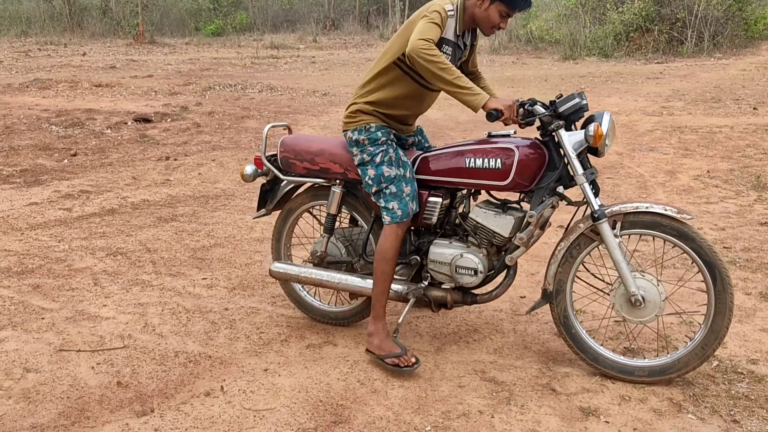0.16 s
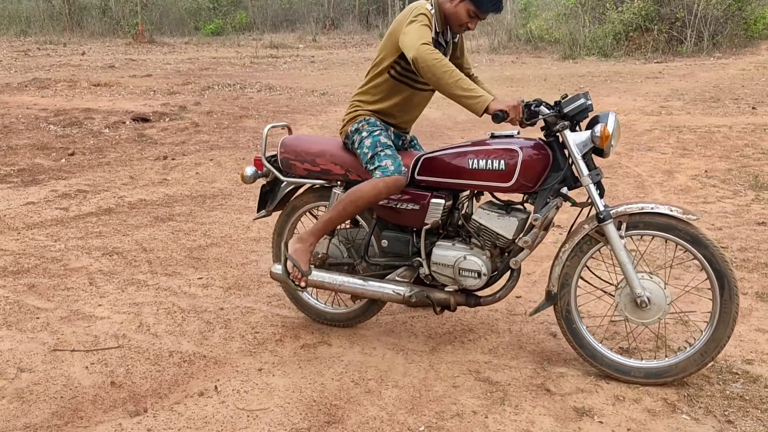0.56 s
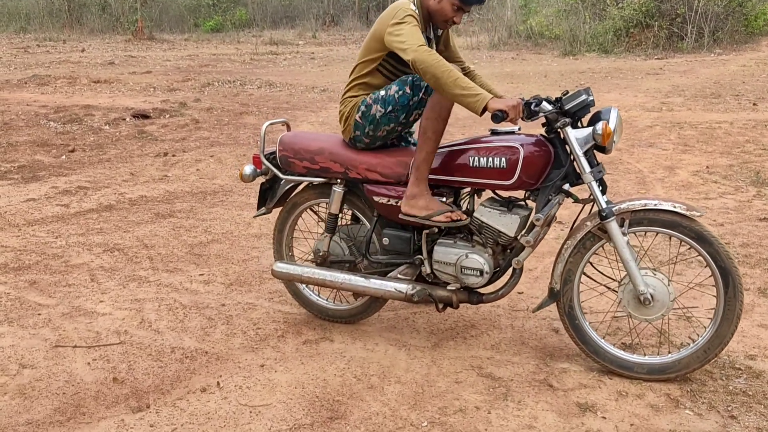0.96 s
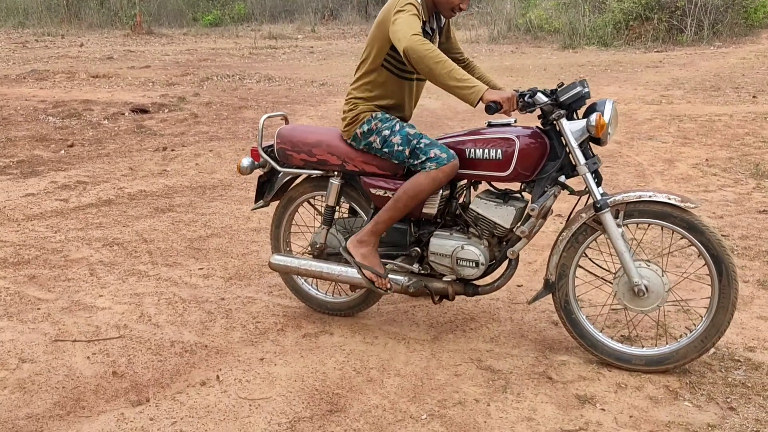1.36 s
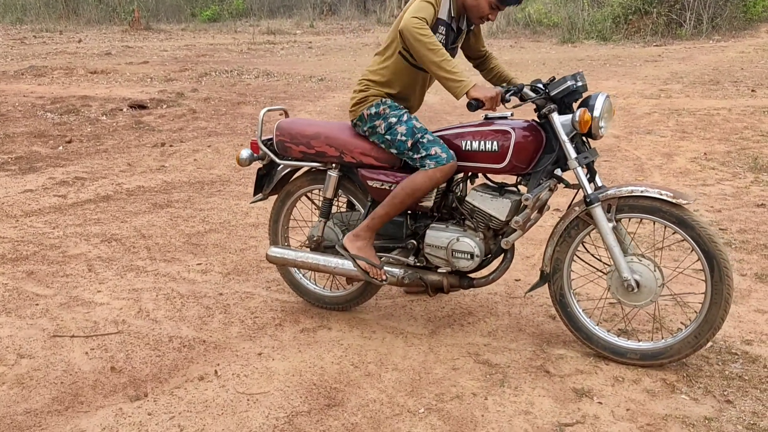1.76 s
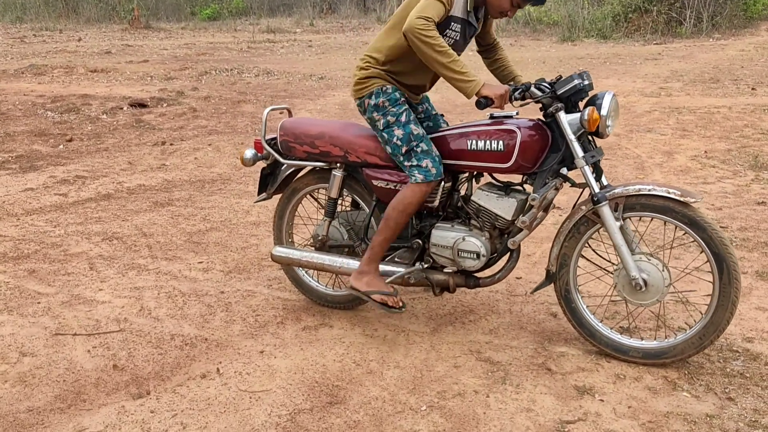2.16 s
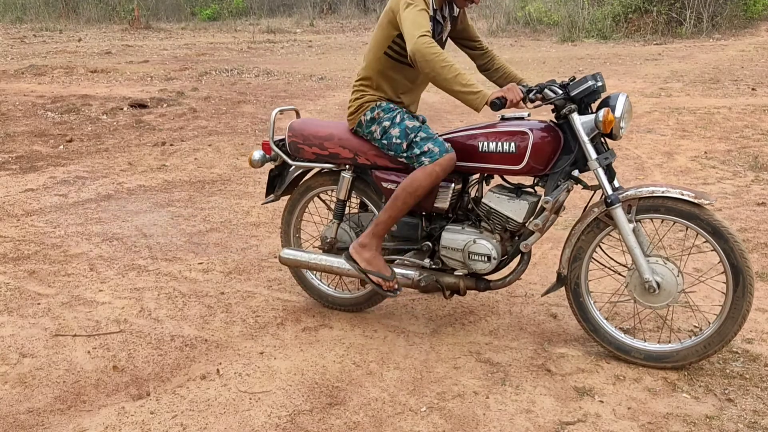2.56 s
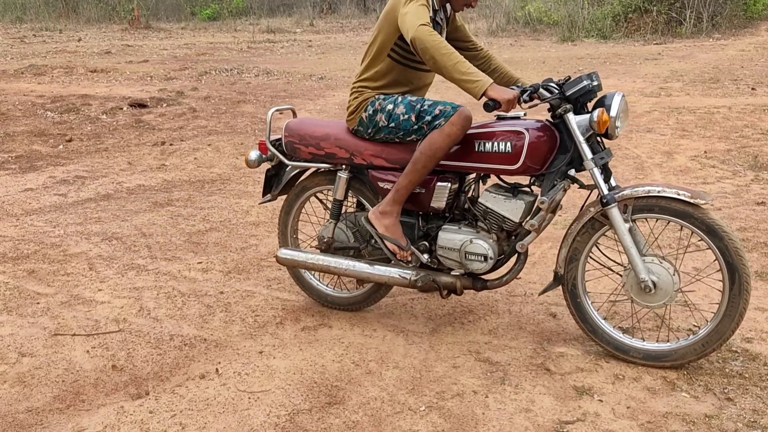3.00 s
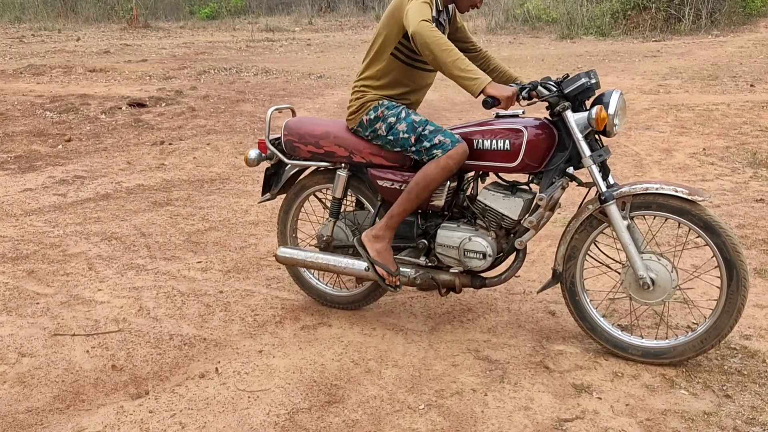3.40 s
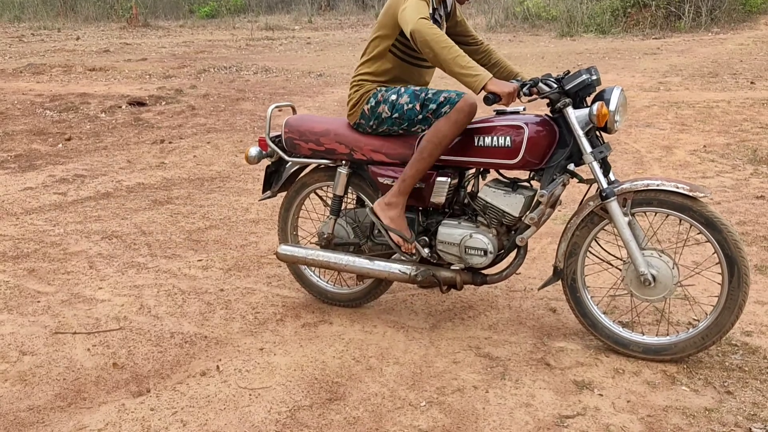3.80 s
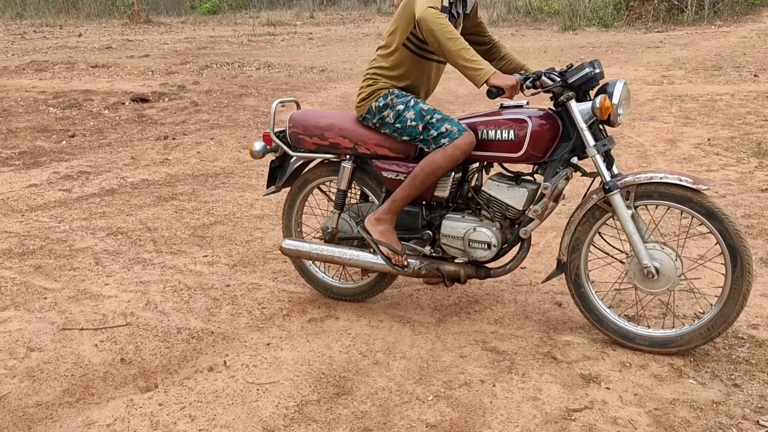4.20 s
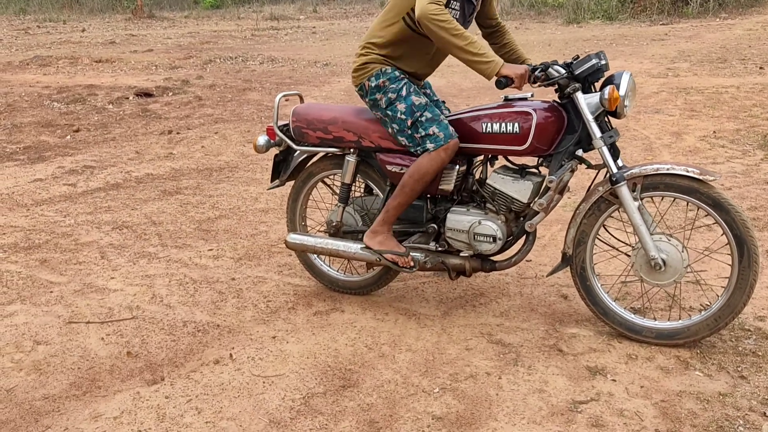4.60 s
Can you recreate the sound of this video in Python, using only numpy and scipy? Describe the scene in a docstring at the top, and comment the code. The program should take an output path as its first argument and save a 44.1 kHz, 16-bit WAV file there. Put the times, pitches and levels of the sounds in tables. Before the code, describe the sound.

Close stereo sound on open dirt: a small motorcycle's kick lever is stamped down, giving a quick run of low falling exhaust puffs, gear whirr and loud steel clatter. Quiet clunks and sandal scuffs follow. A second kick brings a sharp clack, more puffs and a bright ringing lever slam. Then only light ratchet clicks and gritty rustles remain, with a faint bird chirping over low rumble.

```python
"""Open dirt ground: a small two-stroke motorcycle is kicked over twice and does not fire.
Puffs are falling tones with ragged noise; the silencer hums after them. Steel contacts are enveloped
noise bands, the slamming lever adds ringing modes. Gears whirr and grit rustles as uneven noise.
Between kicks the rider feels for compression and the ratchet clunks.
A far bird chirps in falling sines over filtered-noise rumble, drone and hiss."""
import sys
import numpy as np
from scipy import signal
from scipy.fft import rfft, irfft
from scipy.io import wavfile

SR = 44100
rng = np.random.default_rng(int(sys.argv[2]) if len(sys.argv) > 2 else 0)


def put_to_file(sound):
    """Save the sound as 16-bit audio at rate SR, in the file named by the first command-line argument."""
    columns = np.atleast_2d(sound).T  # one column per channel
    safe = np.clip(columns, -1, 1)
    whole_steps = np.round(safe * 32767)
    wavfile.write(sys.argv[1], SR, whole_steps.astype(np.int16))


N = 209430
TIME = np.arange(N) / SR
BINS_HZ = np.maximum(np.arange(N // 2 + 1) * SR / N, 1)

# exhaust puffs, one per turn of the crank: start_s, level_db
PUFFS = [(.241, -22.5), (0.338, -26), (0.451, -29), (0.593, -31), (0.674, -43), (0.751, -39.5),
         (1.503, -50), (2.312, -21.5), (2.410, -22.5), (2.504, -28), (2.634, -28), (2.789, -36)]


def from_db(db):
    """Decibels to gain."""
    return 10 ** (np.asarray(db) / 20)


def rms_one(x):
    """Scale to unit rms."""
    return x / np.sqrt(np.mean(x ** 2) + 1e-20)


def over_hz(points):
    """Table interpolated over log frequency at every bin."""
    hz, value = np.transpose(points)
    return np.interp(np.log(BINS_HZ), np.log(hz), value)


def band(low_hz, high_hz, order=4):
    """Gain of a band with smooth skirts."""
    below = (low_hz / BINS_HZ) ** (2 * order)
    above = (BINS_HZ / high_hz) ** (2 * order)
    return 1 / np.sqrt((1 + below) * (1 + above))


def colour(points):
    """Gain of a tabled spectrum that falls away beyond its ends."""
    return from_db(over_hz(points)) * band(points[0][0], points[-1][0])


def resonances(modes):
    """Gain of a body with broad modes (centre Hz, width Hz, dB), summed in power."""
    powers = [from_db(db) ** 2 / (1 + (2 * (BINS_HZ - hz) / width_hz) ** 2)
              for hz, width_hz, db in modes]
    return np.sqrt(sum(powers))


def noise(gain):
    """Stereo noise of a given colour, more alike in the bass; rms 1."""
    # left-right likeness: freq_hz, correlation (0-1)
    likeness = [(25, .95), (80, .99), (300, .98), (1000, .94), (2700, .86), (5000, .65), (9000, .5)]
    mid, side = rfft(rng.standard_normal((2, N))) * gain
    alike = np.clip(over_hz(likeness), 0, 1)
    common = np.sqrt(1 + alike) * mid
    opposed = np.sqrt(1 - alike) * side * [[1], [-1]]
    return rms_one(irfft(common + opposed, N))


def grain(rate_hz, depth_db):
    """Uneven gain of many tiny contacts: band-limited random level; rms 1."""
    spectrum = rfft(rng.standard_normal(N)) * band(rate_hz / 10, rate_hz, order=2)
    wander = rms_one(irfft(spectrum, N))
    return rms_one(from_db(depth_db * np.clip(wander, -2, 2)))


def ring(force, hz, t60_s):
    """Damped mode: a unit click sets a sine of initial height 1 ringing."""
    radius = from_db(-60 / (t60_s * SR))
    angle = 2 * np.pi * hz / SR
    feedback = [1, -2 * radius * np.cos(angle), radius * radius]
    return signal.lfilter([0, np.sin(angle)], feedback, force + 1e-18)


def add(track, start_s, sound):
    """Mix a sound into a track at a time."""
    start = max(round(start_s * SR), 0)
    track[start:start + len(sound)] += sound[:max(N - start, 0)]


def blows(times_s, levels_db, hold_s, rise_s, decay_s, tail_db, tail_decay_s):
    """Envelope of knocks: each rises, holds briefly, dies fast and leaves a faint tail."""
    power, t = np.zeros(N), TIME[:SR // 3]
    dying = np.exp(-np.maximum(t - hold_s, 0) / decay_s) + from_db(tail_db) * np.exp(-t / tail_decay_s)
    shape = np.minimum(t / rise_s, 1) * dying
    for start_s, db in zip(times_s, levels_db):
        add(power, start_s, (from_db(db) * shape) ** 2)
    return np.sqrt(power)


def envelope(start_s, attack_s, hold_s, release_s):
    """Gain that rises linearly, holds and dies away exponentially."""
    t = TIME - start_s
    return np.clip(t / attack_s, 0, 1) * np.exp(-np.maximum(t - attack_s - hold_s, 0) / release_s)


def outdoors(rumble_db=-56, air_db=-75, drone_start_db=-66.5, drone_db_per_s=3, drone_hz=(140, 195)):
    """Low rumble and a wavering, slowly growing far drone under a faint steady hiss."""
    # low outdoor rumble: freq_hz, density_db (per Hz)
    rumble_spectrum = [(18, 2), (35, 2.5), (55, 4), (90, 0), (130, -14), (250, -11.5), (450, -19.5),
                       (800, -29.5)]
    rumble = from_db(rumble_db) * noise(colour(rumble_spectrum))
    drone_gain = from_db(drone_start_db + drone_db_per_s * TIME)
    drone = drone_gain * noise(band(*drone_hz)) * grain(31, 2.9)
    air = from_db(air_db) * noise(band(290, 7300) / np.sqrt(BINS_HZ))
    return rumble + drone + air


def bird(start_hz=5500, end_hz=2740, fall_s=.0108, swoop_s=.034, held_db=-17, length_s=.075,
         scatter_db=-2):
    """A thin, wavering whistle swoops down and lingers on its last note, blurred by scrub scattering."""
    # bird chirps: start_s, level_db
    chirps = [(1.150, -68), (1.552, -63), (1.955, -62), (2.964, -61.5), (3.317, -60), (3.624, -55),
              (4.007, -58), (4.289, -62.5), (4.588, -57)]
    whistle, t = np.zeros(N), TIME[:int(length_s * SR)]
    hz = end_hz + (start_hz - end_hz) * np.exp(-t / fall_s)
    swoop = np.sin(np.pi * np.minimum(t / swoop_s, 1))
    effort = swoop + from_db(held_db) * np.sin(np.pi * t / length_s)
    chirp = effort * np.sin(2 * np.pi * np.cumsum(hz) / SR)
    for start_s, db in chirps:
        add(whistle, start_s, from_db(db) * chirp)
    whistle = whistle * grain(450, 5)
    scrub = rng.standard_normal((2, SR // 4)) * np.exp(-TIME[:SR // 4] / 0.034)
    scrub /= np.linalg.norm(scrub, axis=1, keepdims=True)
    scattered = signal.fftconvolve(whistle[None], scrub, axes=1)[:, :N]
    return whistle + from_db(scatter_db) * scattered


def gear_speed(spin_up_db_per_s=112, resting_db=-78):
    """Whirr gain: strokes spin the gears up, friction runs them down; never quite still under the rider."""
    # lever strokes, two full kicks and gentle pushes: top_speed_s, whirr_db, run_down_db_per_s
    strokes = [(0.368, -43, 48), (1.33, -61, 28), (1.84, -60.5, 82), (2.381, -43.5, 46.5),
               (3.559, -60.5, 103.5), (3.93, -63, 35.5), (4.3, -68.5, 32.5), (4.72, -62.5, 31)]
    power = from_db(resting_db) ** 2
    for peak_s, db, run_down_db_per_s in strokes:
        drop_db = np.maximum(spin_up_db_per_s * (peak_s - TIME), run_down_db_per_s * (TIME - peak_s))
        power = power + from_db(db - drop_db) ** 2
    return np.sqrt(power)


def grit_motion(tyre_db=-5.5, resting_db=-74.5):
    """Grit gain: tyres rock with every stroke (dB against the whirr), sandals scuff dirt and footrest."""
    # sandal scuffs: middle_s, half_length_s, level_db
    scuffs = [(0.145, 0.028, -61), (0.247, 0.028, -51), (0.377, 0.027, -39), (0.95, 0.025, -65.5),
              (1.538, 0.032, -58.5), (1.82, 0.086, -53.5), (2.222, 0.017, -56.5), (2.705, 0.098, -54.5),
              (4.22, 0.067, -64), (4.685, 0.038, -59.5)]
    tyres = from_db(tyre_db) * gear_speed()
    power = tyres ** 2 + from_db(resting_db) ** 2
    for middle_s, half_s, db in scuffs:
        power = power + (from_db(db) / np.cosh((TIME - middle_s) / half_s)) ** 2
    return np.sqrt(power)


def crackle(per_s=130, size_db=4, crackle_db=-6, decay_s=0.0012):
    """Single grains crack: a few loud ones underfoot, many small ones while the grit shifts."""
    # dry grit ticks: start_s, level_db
    ticks = [(0.166, -43.5), (.176, -46), (1.752, -48.5), (1.914, -43.5), (3.041, -43), (4.155, -54),
             (4.338, -49.5), (4.411, -53.5), (4.546, -50)]
    # tick colour: freq_hz, density_db (per Hz)
    tick_spectrum = [(1200, 1.5), (3000, 3.5), (9000, 3.5), (10500, -8), (14000, -22.5)]
    times_s, levels_db = np.transpose(ticks)
    loud = blows(times_s, levels_db, hold_s=0.0006, rise_s=.0004, decay_s=0.0027,
                 tail_db=-11.0, tail_decay_s=0.027)
    born = rng.random(N) < per_s / SR
    spread_db = size_db * np.minimum(rng.exponential(1, N), 3)
    sizes = born * grit_motion() * from_db(crackle_db + spread_db)
    small = signal.lfilter([1], [1, -np.exp(-1 / (decay_s * SR))], sizes + 1e-18)
    cracks = (loud + small) * noise(1)
    return irfft(rfft(cracks) * rms_one(colour(tick_spectrum)), N)


def rubbing(whirr_db=1, rustle_db=1):
    """Gear teeth slide and grit shifts under tyres and sandals, both catching and slipping unevenly."""
    # gear whirr: freq_hz, density_db (per Hz)
    whirr_spectrum = [(180, -38.5), (300, -18.5), (432, -3), (622, -13.5), (886, -7.5), (1420, -17.5),
                      (1970, -13), (3270, -24), (3770, -26.5), (5000, -23.5), (6500, -45), (11000, -120)]
    # grit rustle: freq_hz, density_db (per Hz)
    rustle_spectrum = [(1760, -32.5), (3000, -1.5), (4060, -8.5), (5310, -8), (7280, -1), (8880, -1.5),
                       (9500, -4.5), (10000, -21.5), (14700, -26), (15500, -36.5)]
    teeth, slips = grain(110, 3.6), grain(130, 2.5)
    whirr = from_db(whirr_db) * gear_speed() * noise(colour(whirr_spectrum)) * teeth
    rustle = from_db(rustle_db) * grit_motion() * noise(colour(rustle_spectrum)) * slips
    return whirr + rustle


def lever(slam_s=2.514, attack_s=0.0086, slam_db=-16.5, chatter_db=-39, spring_db=-36,
          rattle_db=0.5, ring_db=-2.04, spring_hz=(6900, 9250)):
    """The freed lever buzzes on its stop, then chatters lightly; its modes ring and its spring sizzles."""
    # slam colour: freq_hz, density_db (per Hz)
    slam_spectrum = [(350, -10.5), (500, -4.5), (680, -22), (860, -9), (1150, -21.5), (1750, -12),
                     (2500, -13), (3700, -7.5), (5000, -10.5), (6500, -8), (9000, 2), (10100, -22),
                     (14500, -20)]
    # modes of lever and spring: freq_hz, rms_db, t60_s
    lever_modes = [(840, -6, .05), (1714, 3, .13), (2045, -3, .04), (2172, -.5, .07), (2347, -7, .05),
                   (2694, -4, .06), (2845, -5, .06), (3224, -7, .12), (3714, -2, .15), (3827, -1, .15),
                   (4273, -4, .14), (4686, -3.5, .14), (5096, -6, .12), (5440, -3, .1), (5620, -2, .09),
                   (5797, -6, .11), (6521, -1, .06), (6925, 0, .08), (7044, -4, .15), (7235, -3, .12),
                   (7466, -1, .09), (7587, 0, .14), (7878, 0, .17), (8104, -2, .09), (8475, 0, .17),
                   (8707, 2, .12), (8812, 2, .14), (8940, 0, .17), (9096, 1, .17), (9307, 0, .16)]
    slam = from_db(slam_db) * envelope(slam_s, attack_s, hold_s=0.016, release_s=0.0056)
    chatter = from_db(chatter_db) * envelope(slam_s, attack_s, hold_s=0.07, release_s=.012)
    force = np.hypot(slam, chatter)
    bounces = grain(300, 2.5)
    rattle = force * noise(colour(slam_spectrum)) * bounces
    taps = force * bounces * noise(1)
    ringing = sum(from_db(db) * rms_one(ring(taps, hz, t60_s)) for hz, db, t60_s in lever_modes)
    ringing = rms_one(ringing) * np.sqrt(np.mean(force ** 2))
    sizzle = from_db(spring_db) * envelope(slam_s, attack_s, hold_s=0.07, release_s=0.027)
    spring = sizzle * noise(band(*spring_hz, order=20)) * bounces
    return from_db(rattle_db) * rattle + from_db(ring_db) * ringing + spring


def contacts(rattles_per_s=34, rattle_db=7.5, rattle_spread_db=2):
    """Knocks and random rattle of loose parts: (s, clunk dB, upper ring dB, click dB, body dB)."""
    # steel contacts of lever, ratchet and stand: start_s, level_db, hardness (0-1)
    knocks = [(.205, -33.5, 0.16), (.229, -31, 0), (.338, -36.5, 0.05), (.3412, -29, 0.8),
              (.4169, -21.5, 0.6), (.4347, -23, 0.55), (.463, -25, 0.64), (.5471, -18, 0.62),
              (.5634, -23, 0.53), (.5758, -22.5, 0.29), (.5825, -23, 0.92), (.5945, -30.5, 0.9),
              (.638, -31.5, 0.81), (.672, -29, 0.37), (.7565, -23, 0.77), (.764, -29, 0.1), (.82, -46, 0),
              (.906, -39, 0.23), (.94, -45, 0), (.994, -44.5, 0), (1.025, -48, 0.13), (1.1268, -45.5, 0.11),
              (1.1817, -45, 0.8), (1.272, -30.5, 0.71), (1.3014, -40.5, 0.74), (1.316, -43.5, 0.14),
              (1.3697, -32.5, 0.41), (1.4137, -32.5, 0.44), (1.423, -42, 0.22), (1.51, -47, 0.13),
              (1.9497, -43, 0.92), (1.952, -47, 0.11), (2.2498, -46.5, 0.93), (2.289, -38, 0),
              (2.3178, -34.5, 0.85), (2.3932, -17, 0.85), (2.395, -20, 0.05), (2.4404, -35, 0.7),
              (2.613, -38, 0), (2.695, -45, 0), (2.746, -39.5, 0.13), (2.776, -39, 0.05), (2.841, -47, 0),
              (2.995, -43, 0), (3.07, -43.5, 0.3), (3.1013, -44, 0.5), (3.143, -47, 0.27),
              (3.193, -48.5, 0.35), (3.214, -41.5, 0.15), (3.232, -52, 0.03), (3.3605, -37, 0.26),
              (3.372, -38, 0.07), (3.3605, -36, 0.35), (3.494, -37.5, 0.45), (3.5458, -33.5, 0.48),
              (3.5877, -36.5, 0.38), (3.6054, -37, 0.39), (3.6359, -42, 0.21), (3.6621, -32.5, 0.55),
              (3.841, -48, 0.45), (3.8636, -40.5, 0.48), (3.897, -49, 0.23), (3.9145, -30, 0.53),
              (3.9574, -34, 0.42), (4.0106, -33, 0.41), (4.027, -50, 0.34)]
    # upper crankcase modes ring fully only when struck fairly hard: hardness (0-1), gain_db
    upper_ring = [(.05, -11.5), (.4, 3.5)]
    when, size, hard = rng.random((200, 3)).T
    start_s = (np.arange(len(when)) + when) / rattles_per_s
    whirr_db = np.interp(start_s, TIME, 20 * np.log10(gear_speed()))
    db = whirr_db + rattle_db + rattle_spread_db * (2 * size - 1)
    rattles = np.transpose([start_s, db, hard / 2])[start_s < TIME[-1]]
    start_s, db, hardness = np.vstack([knocks, rattles]).T
    hardness = np.clip(hardness, 0, 1)
    ring_db = db + np.interp(hardness, *np.transpose(upper_ring))
    # harder contacts click more and shake the frame less
    click_db = db - 32.5 + 29.5 * hardness
    body_db = db - 2.5 - 24.5 * hardness
    return start_s, db, ring_db, click_db, body_db


def clatter(case_lag_s=0.00083, frame_lag_s=0.0044, tank_lag_s=0.0096, click_gain_db=3,
            case_gain_db=-14, frame_gain_db=-2, tank_gain_db=-7, case_split_hz=2600, strike_spread_db=2.0):
    """Contacts click and the crankcase clunks; heavier frame and tank follow later and ring longer."""
    # click colour: freq_hz, density_db (per Hz)
    click_spectrum = [(2350, -39), (4000, -14), (4660, -12), (7090, 0), (7550, 1.5), (8450, -7), (9150, -4),
                      (9790, -21), (12400, -34), (13600, -47.5), (15500, -47.5)]
    # crankcase resonances: freq_hz, width_hz, level_db
    case_modes = [(1287, 89, -10.5), (1388, 45, -8.5), (1696, 330, -3.5), (2254, 280, -4.5),
                  (2530, 60, -11.5), (2855, 100, -3), (3286, 100, -7.5), (4050, 200, -12.5),
                  (4674, 590, -17)]
    # frame and panel resonances: freq_hz, width_hz, level_db
    frame_modes = [(735, 30, 2), (889, 45, 5.5), (1106, 60, 0.5), (1194, 170, -3.5)]
    start_s, clunk_db, ring_db, click_db, body_db = contacts()
    clicks = blows(start_s, click_db + click_gain_db, hold_s=0.0029, rise_s=0.00048, decay_s=0.0048,
                   tail_db=-21.0, tail_decay_s=0.033)
    steel = clicks * noise(colour(click_spectrum))
    # no two contacts land on the same spot: mode levels vary per strike
    mixes_db = strike_spread_db * rng.standard_normal((len(start_s), len(case_modes)))
    skirts = band(1200, 4700, order=6)
    for (hz, width_hz, db), mix_db in zip(case_modes, mixes_db.T):
        source_db = clunk_db if hz < case_split_hz else ring_db
        clunk = blows(start_s + case_lag_s, source_db + case_gain_db + db + mix_db, hold_s=0.007,
                      rise_s=0.0006, decay_s=0.0061, tail_db=-19.5, tail_decay_s=.04)
        steel = steel + clunk * noise(resonances([(hz, width_hz, 0)]) * skirts)
    frame = blows(start_s + frame_lag_s, body_db + frame_gain_db, hold_s=0.0025, rise_s=0.0083,
                  decay_s=0.011, tail_db=-17.5, tail_decay_s=0.06)
    tank = blows(start_s + tank_lag_s, body_db + tank_gain_db, hold_s=0.0068, rise_s=0.016,
                 decay_s=0.007, tail_db=-9.0, tail_decay_s=0.048)
    bouncing, buzzing = grain(300, 2.8), grain(220, 2.5)
    frame_sound = frame * buzzing * noise(resonances(frame_modes) * band(770, 1700))
    tank_sound = tank * noise(band(380, 510, order=6))
    return steel * bouncing + frame_sound + tank_sound


def ground(x, count=8, scatter_db=-11, spread_s=.022):
    """Bare ground, wheels and tank throw back a few early echoes, unlike at each port."""
    delays_s = rng.uniform(0.001995, spread_s, (2, count, 1))
    signs = rng.choice([-1, 1], (2, count, 1))
    echoes = np.sum(signs * np.exp(-2j * np.pi * BINS_HZ * delays_s), axis=1) / np.sqrt(count)
    scattered = irfft(rfft(x) * echoes * band(380, 11000, order=2), N)
    return x + from_db(scatter_db) * scattered


def silencer(hz=197, rise_s=0.0068, decay_s=0.012, tail_db=-10):
    """Air swings back after a puff and hums at the silencer's own pitch."""
    # gulps of air swinging back: start_s, level_db
    gulps = [(0.273, -29.5), (.386, -32), (0.517, -34), (2.446, -25.5), (2.656, -39)]
    hum, t = np.zeros(N), TIME[:SR // 4]
    tail = from_db(tail_db) * np.exp(-t / .045)
    dying = np.exp(-np.maximum(t - 2 * rise_s, 0) / decay_s) + tail
    swing = np.minimum(t / rise_s, 1) * dying * np.sin(2 * np.pi * hz * t)
    for start_s, db in gulps:
        add(hum, start_s, from_db(db) * swing)
    return hum * grain(90, 1.5)


def ports_open(lag_s=0.0028, chuff_db=-15.0, chuff_hz=(300, 520)):
    """As the piston uncovers the port, each puff starts with a hollow chuff."""
    start_s, db = np.transpose(PUFFS)
    chuffs = blows(start_s + lag_s, db + chuff_db, hold_s=0.0045, rise_s=.003, decay_s=.007,
                   tail_db=-15, tail_decay_s=0.044)
    return chuffs * noise(band(*chuff_hz, order=6))


def exhaust(start_hz=430, end_hz=72, swell_s=0.015, steepness=4.05, flutter_db=-12):
    """Each unburnt charge leaves as a short ragged puff whose pitch drops as the pressure is spent."""
    # weak puffs drop in pitch more slowly: level_db, fall_s
    puff_fall = [(-29, .0127), (-21, .0096)]
    # what the silencer lets out: freq_hz, gain_db
    pipe = [(30, 7.5), (70, 3), (100, 4), (124, -3.5), (155, -3.5), (195, 4.5), (250, 1.5), (320, -7.5),
            (480, 3), (900, -3.5)]
    tone, flow, t = np.zeros(N), np.zeros(N), TIME[:SR // 8]
    swell = (t / swell_s * np.exp(1 - t / swell_s)) ** steepness
    for start_s, db in PUFFS:
        fall_s = np.interp(db, *np.transpose(puff_fall))
        hz = end_hz + (start_hz - end_hz) * np.exp(-t / fall_s)
        pressure = from_db(db) * swell
        add(tone, start_s, pressure * np.sin(2 * np.pi * np.cumsum(hz) / SR))
        add(flow, start_s, pressure)
    flutter = grain(220, 2)
    turbulence = from_db(flutter_db) * flow * noise(band(35, 350, order=3))
    ragged = tone * flutter + turbulence
    return irfft(rfft(ragged) * from_db(over_hz(pipe)), N)


def scene():
    """The motorcycle stands a little to the right: a phase lag at the left port; bird and air have none."""
    # left port lag: freq_hz, phase_rad
    left_lag = [(40, -2), (250, 0.57), (750, 1.29), (1500, 1.15), (4500, 3.5), (9000, 5), (15000, 4.5)]
    steel_and_grit = ground(clatter() + lever() + rubbing())
    left, right = exhaust() + ports_open() + silencer() + steel_and_grit + crackle()
    left = irfft(rfft(left) * np.exp(-1j * over_hz(left_lag)), N)
    return np.array([left, right]) + bird() + outdoors()


def record(dry):
    """Each microphone port has its own colour; a steep low-pass cuts the top."""
    # port balance: freq_hz, left_minus_right_db
    balance = [(100, 6), (300, 6.5), (750, 3.5), (2500, 0.5), (4800, -1.5), (6000, -3), (7500, -8.5),
               (8700, 4.5), (9400, 8), (11000, 1)]
    ports = from_db(over_hz(balance) / 2 * [[1], [-1]])
    ports = ports / np.sqrt(np.mean(ports ** 2, axis=0))
    coloured = irfft(rfft(dry) * ports, N)
    top_cut = signal.cheby2(16, 60, 15900, fs=SR, output="sos")  # stopband edge in Hz
    return signal.sosfilt(top_cut, coloured)


dry = scene()
out = record(dry)
put_to_file(out)
```